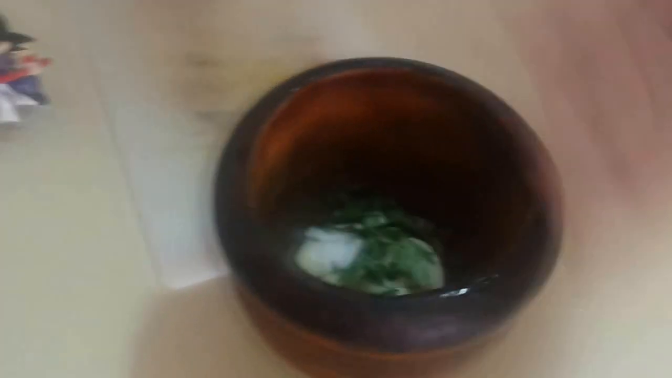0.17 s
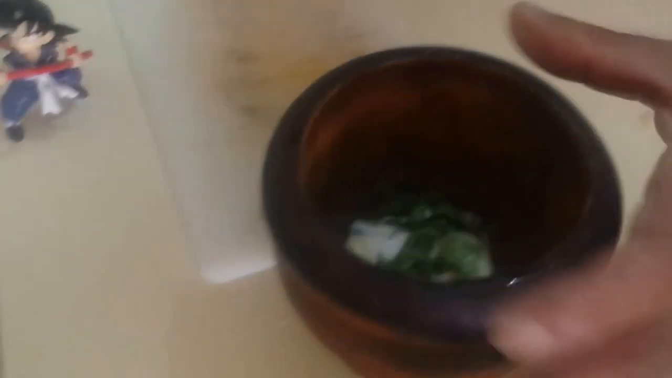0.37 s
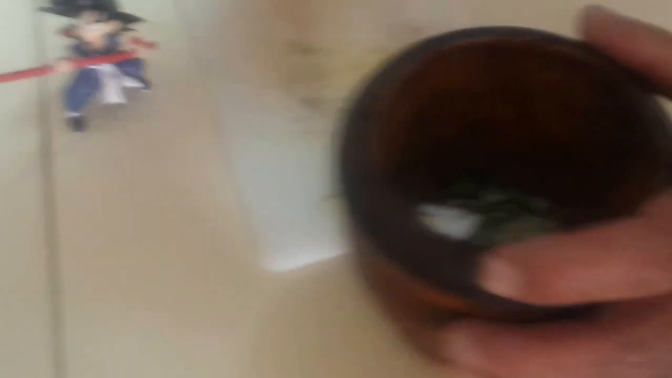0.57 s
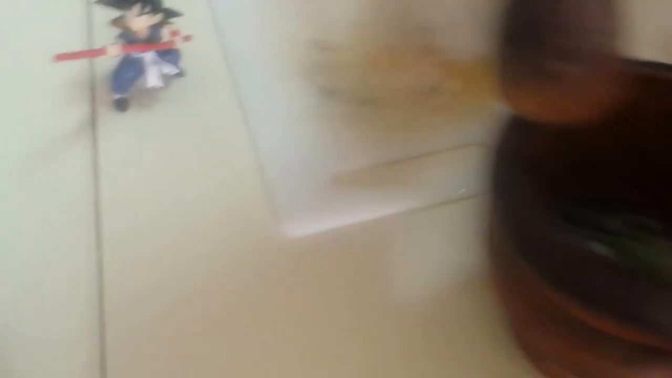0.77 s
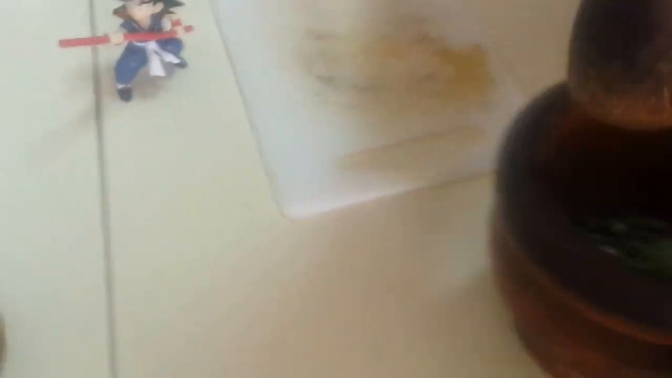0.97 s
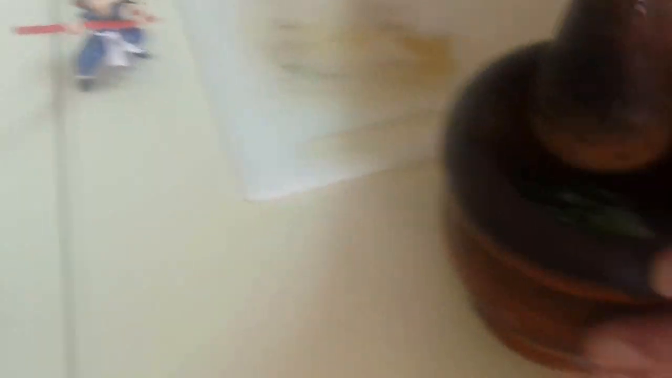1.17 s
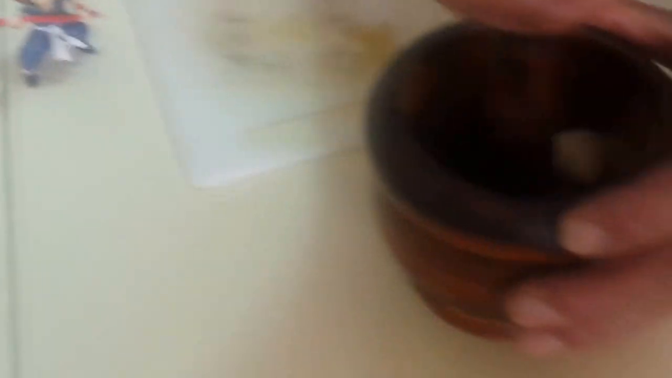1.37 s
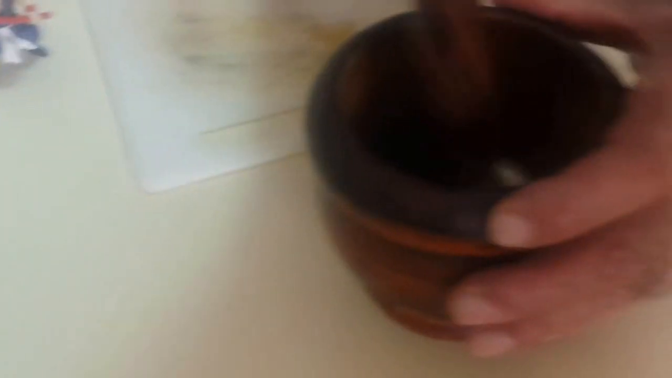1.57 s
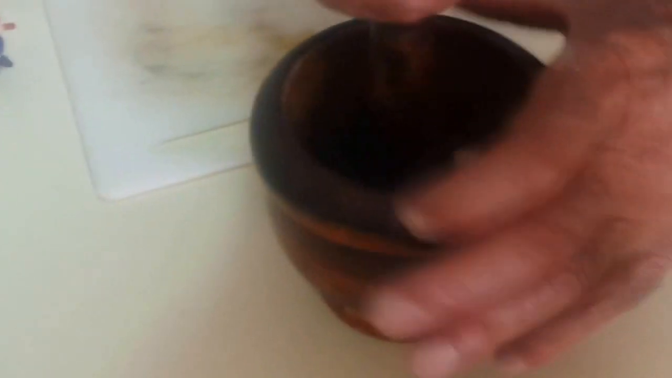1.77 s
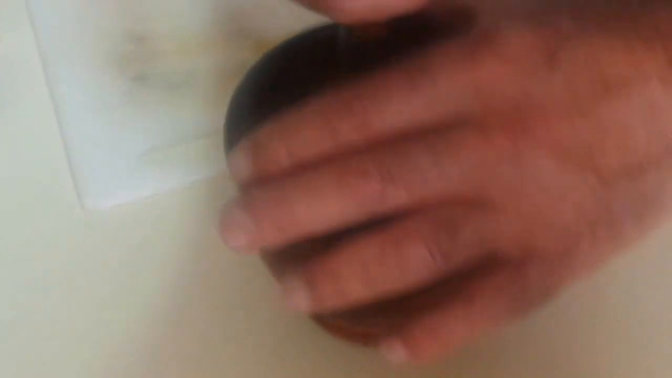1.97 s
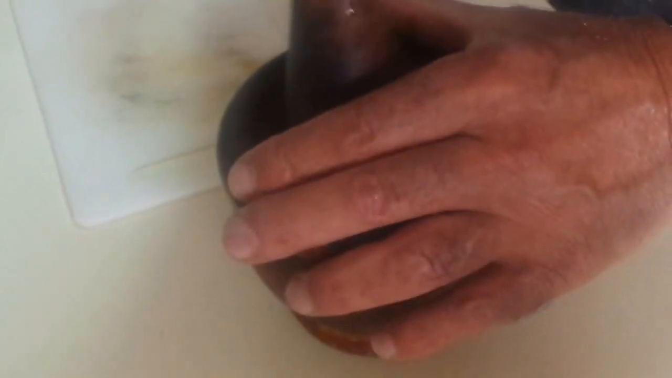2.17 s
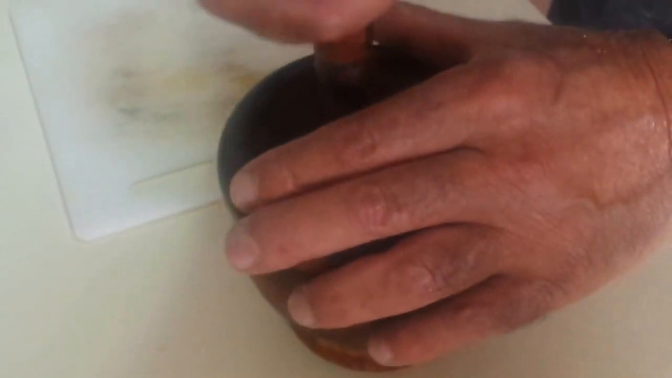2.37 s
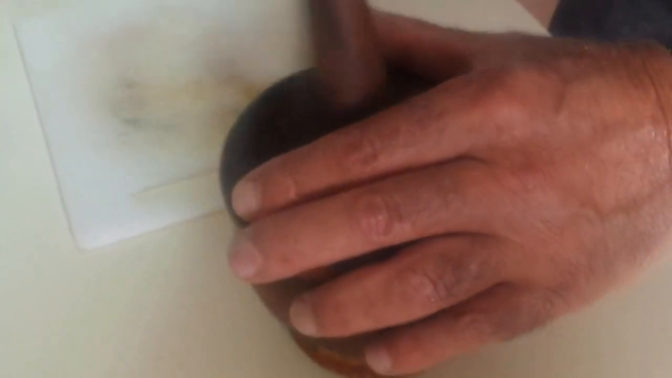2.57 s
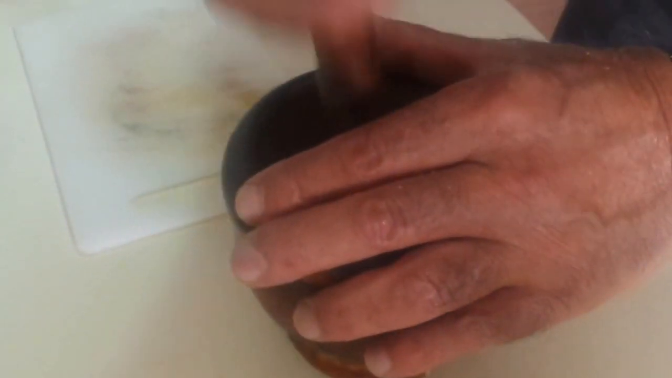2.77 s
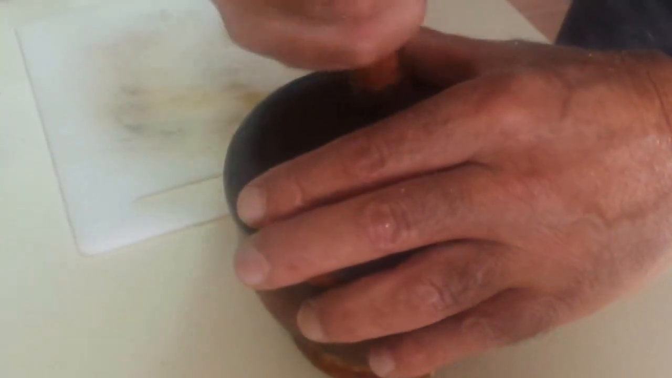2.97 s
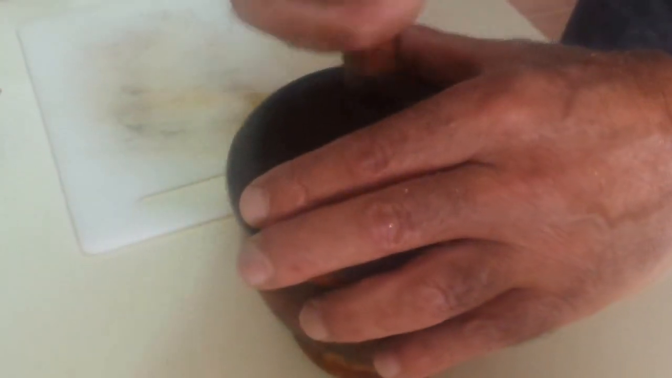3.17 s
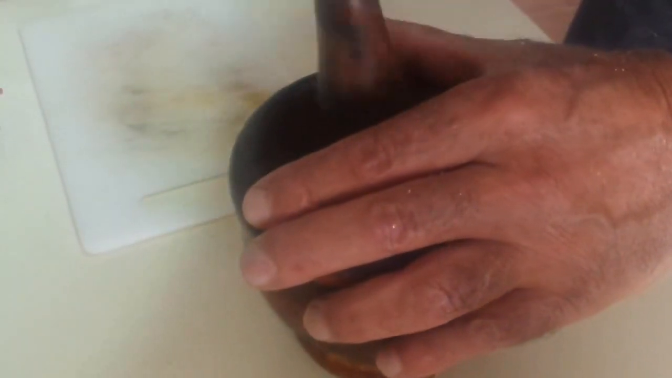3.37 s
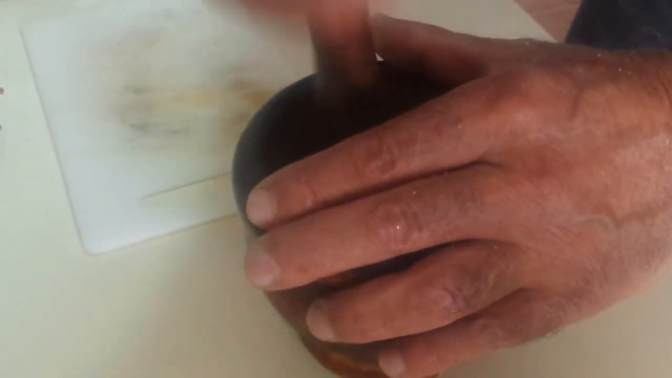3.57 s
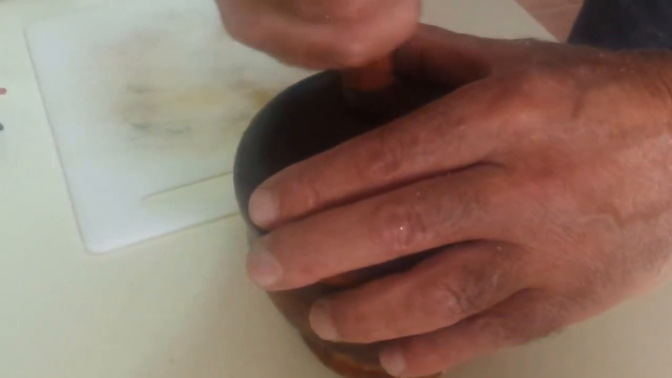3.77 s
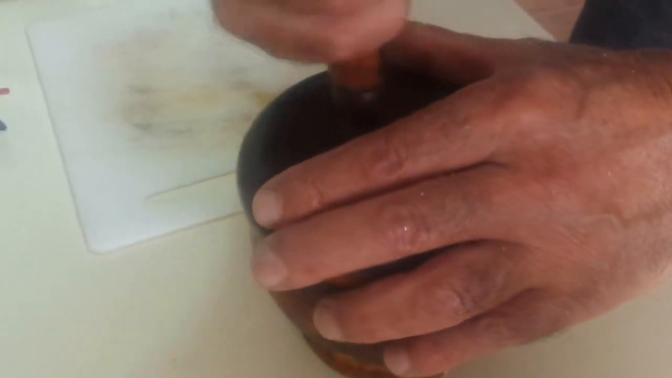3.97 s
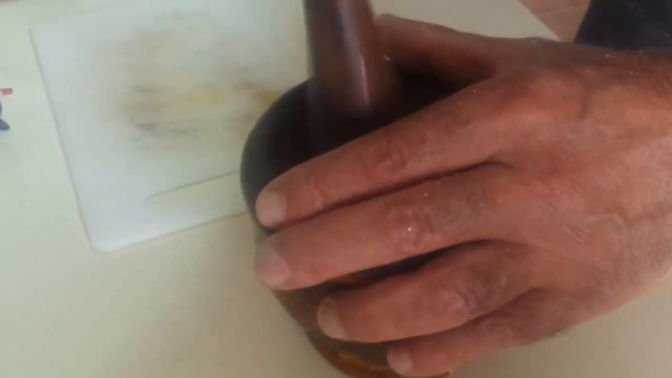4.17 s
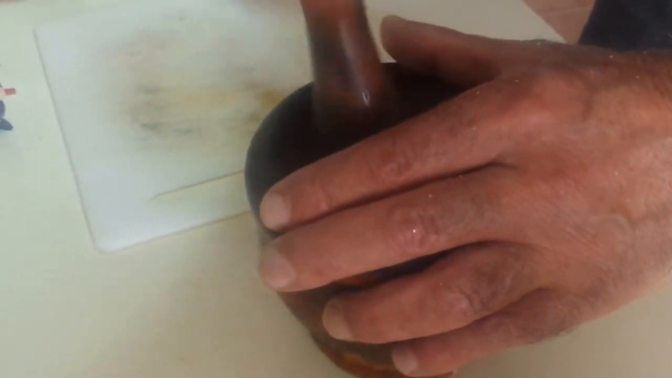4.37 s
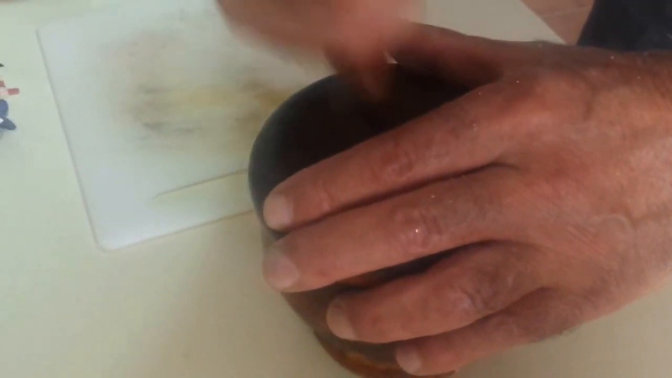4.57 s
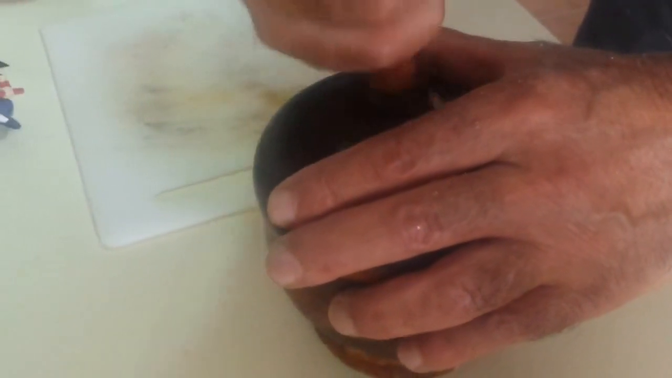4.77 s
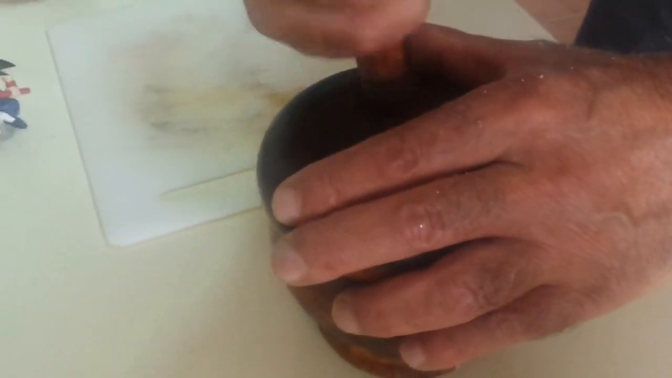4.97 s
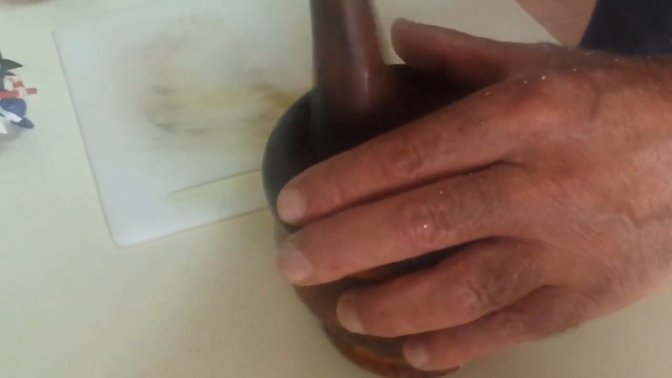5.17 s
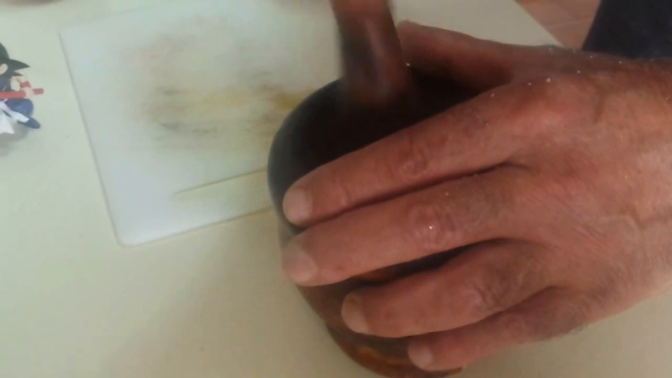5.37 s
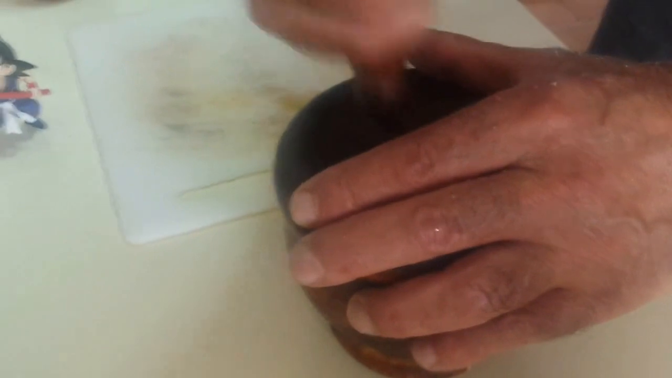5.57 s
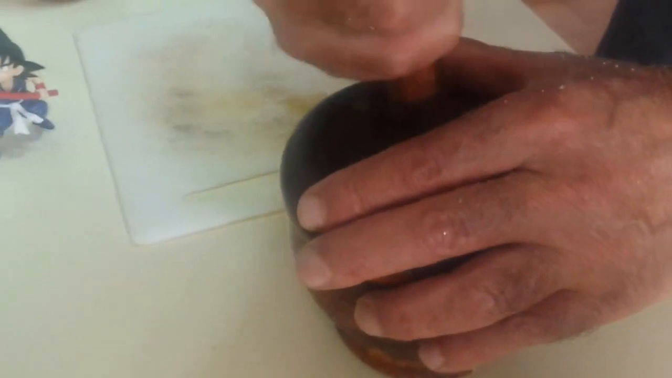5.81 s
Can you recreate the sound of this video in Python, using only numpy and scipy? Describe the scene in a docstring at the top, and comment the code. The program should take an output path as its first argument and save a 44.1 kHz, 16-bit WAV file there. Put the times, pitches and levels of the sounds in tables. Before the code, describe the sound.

At the very start a metal utensil hits the table on its end, then flat at 0.12 s, with two hard knocks and a thin high ring that rocks once at 0.2 s and stops by 1 s. Around 0.6 s a hand slides softly on the wooden bowl, and at 0.7 s the rim gives a hollow knock. Garlic pounding begins gently at 1.25 s, a heavy blow falls at 1.7 s, and the rim knocks again at 2.0 s. From 2.25 to 4.7 s strokes come regularly, about every quarter second, the strongest from 3.9 s. Each is a dry tick and landing, often with a small bounce, damp crunch, low table boom, rattle and occasional faint crockery chink. Light prods follow at 4.9 and 5.2 s, a loud bare-wood knock at 5.45 s and a bouncing stroke at 5.7 s. Close microphone, short bright room reflections, faint wavering hum and hiss.

```python
"""First a metal utensil clinks down on a kitchen table; then a wooden pestle pounds garlic in a wooden mortar.
Each stroke ticks and lands, most bounce: wood rings briefly, crushed leaves and garlic add noise.
The table booms as dying sines; loose things on it rattle as bursts of small knocks, and crockery chinks.
Close to two microphone ports, the sounds also feed a hard-walled room of sparse reflections.
A faint wavering hum and a hiss lie underneath."""
import sys
import numpy as np
from scipy import signal
from scipy.fft import rfft, irfft
from scipy.io import wavfile
from scipy.ndimage import uniform_filter1d

SR = 44100
rng = np.random.default_rng(int(sys.argv[2]) if len(sys.argv) > 2 else 0)


def decibels_to_gain(level_db):
    """Convert a level in decibels to a linear amplitude gain (20 dB per decade)."""
    exponent = np.asarray(level_db, float) / 20
    return 10 ** exponent


def to_wav(sig):
    """Store sig (one row per channel, or 1-D mono) as 16-bit WAV at the path in sys.argv[1].

    Samples outside -1..1 are clipped; the rate is SR.
    """
    pcm = np.clip(np.atleast_2d(sig), -1, 1) * 32767
    pcm = np.round(pcm).astype(np.int16)
    wavfile.write(sys.argv[1], SR, pcm.T)  # frames by channels


N = 257544  # length [samples]

# strokes into the garlic: (time of tick [s], tick [dB], landing [dB], rattle to the walls [dB], table boom [dB])
POUNDS = [(1.249, -22, -18.5, -33.5, -31), (1.679, -15.5, -1.5, -16.5, -14.5),
          (2.25, -13, -19, -27.5, -11.5), (2.581, -11, -12, -12.5, -18.5),
          (2.861, -14.5, -10.5, -25.5, -20), (3.13, -15.5, -21.5, -27, -19),
          (3.4, -18.5, -16.5, -19.5, -16.5), (3.672, -12, -23, -16, -10.5), (3.928, -14.5, -1.5, -12, -14),
          (4.184, -15.5, -0.5, -14, -9), (4.425, -15.5, -12, -16, -14), (4.68, -15.5, -3, -15.5, -9),
          (5.683, -12.5, -13, -18.5, -16)]
# the pestle bounces once after most strokes: (time [s], level [dB])
BOUNCES = [(1.324, -19.5), (2.295, -8.5), (2.629, -18), (3.175, -14.5), (3.445, -21), (3.718, -9.5),
           (3.969, -7.5), (4.228, -33), (4.468, -21), (4.733, -17), (5.739, -11.5)]
# single hard contacts on bare wood:
# (time [s], level [dB], rattle to the walls [dB], rattle treble to the walls [dB], table boom [dB])
TAPS = [(0.014, -10, -17, -38, -21), (0.124, -5.5, -19, -43.5, -23), (5.437, 0, -15.5, -35, -14.5)]
# light strokes that stop in the paste without landing: columns as TAPS
PRODS = [(4.927, -24, -35.5, -39, -32), (5.179, -14, -34.5, -36, -30)]
# the pestle catches the rim and the empty upper bowl rings out: columns as TAPS
RIM_KNOCKS = [(0.7, -5, -21, -44.5, -43), (2.026, -3, -26.5, -40.5, -37)]

# sound of each part of a stroke at USUAL_DB: (upper ring [dB], crack [dB], table push [dB], thump [dB])
TICK_SOUND = (-12.5, -15, -4.5, -1.5)
LANDING_SOUND = (-22, -32.5, -10.5, -100)
BOUNCE_SOUND = (-15, -24.5, -16, -9)
# sound of the single contacts: (upper ring over level [dB], crack over rattle treble [dB],
# push over boom [dB], thump over boom [dB], share sent to the walls [dB])
TAP_SOUND = (-11, 13, 9.5, -16, -32)
PROD_SOUND = (0.5, 18.5, 22, 18, -35)
RIM_SOUND = (-0.5, 12.5, 13, -14, -32.5)
# crispness from cloves to paste: (time [s], treble gain [dB])
CRISPNESS = [(1.2, 0), (2.6, 2), (3.3, 1), (4, 1), (5.7, -3)]

# low and upper ring of the mortar before detuning: (frequency [Hz], relative level [dB], t60 [s])
MORTAR_LOW = [(438, -8.5, 0.011), (719, -2, 0.0071), (809, -0.5, 0.009), (1112, -13.5, 0.012),
              (1290, -7, 0.0049)]
MORTAR_UPPER = [(1830, -14, 0.005), (2325, 5.5, 0.0047), (2857, -3.5, 0.01), (3426, -1.5, 0.005),
                (3990, 6, 0.0025)]
# table top before detuning; close pairs beat: (frequency [Hz], relative level [dB], t60 [s])
TABLE_MODES = [(85, -19, 0.17), (111.7, -17, 0.64), (125.2, -9.5, 0.57), (155.5, 6.5, 0.34),
               (156.55, 0.5, 0.46), (185, -16, 1), (236, -49, 0.074)]
# cupboard-like hollow: (frequency [Hz], relative level [dB], t60 [s])
HOLLOW_MODES = [(271, -9.5, 1), (320.8, -1, 0.94), (342, -17, 0.6)]
# spectrum of the loose things on the table: (frequency [Hz], relative density [dB])
RATTLE_SPECTRUM = [(150, -23.5), (250, -4), (321, -1.5), (574, -6.5), (673, -3), (1400, -3.5), (1530, -5.5),
                   (2670, -12), (3800, -28), (4940, -64), (8360, -120)]
# spectrum of cracks, fibres and skin: (frequency [Hz], relative density [dB])
TREBLE_SPECTRUM = [(2060, -12.5), (3500, -2.5), (6120, -2), (6650, -4), (13600, -21), (15200, -23.5),
                   (16000, -79)]

# crockery chinks around the time of most bounces: (time [s], level before the near and wall gains [dB])
CHINKS = [(2.62, -31), (3.44, -54), (3.712, -38), (3.968, -31.5), (4.224, -48), (4.482, -34.5), (4.72, -45),
          (5.72, -36)]
# crockery ring: (frequency [Hz], relative level [dB], t60 [s])
CROCKERY_MODES = [(3818, -6, .15), (4062, -12, .12), (4800, -15, .1), (6175, 0, .16)]
# the utensil lands on its end, then flat, then rocks once: (time [s] of each landing)
UTENSIL_LANDINGS = .0145, .1235, .212
# its ring: (frequency [Hz], first landing [dB], second [dB], third [dB], t60 [s])
UTENSIL_MODES = [(2336, -52, -44, -28, .45), (3283, -24, -28, -40, .6), (3296, -40, -42, -45, .5),
                 (8210, -33, -64, -75, .45), (9170, -56, -56, -75, .3), (11000, -45, -64, -80, .2),
                 (14300, -51, -68, -80, .1)]
# a hand slides on the bowl: (time [s], length [s], hiss [dB], bowl ring [dB])
SLIDES = [(0.566, 0.04, -56, -47), (0.634, 0.088, -53, -43.5)]

# reverberation of the room: (frequency [Hz], t60 [s])
ROOM_DECAY = [(100, 0.63), (260, 0.67), (700, 0.64), (1840, 0.57), (4850, 0.54), (12800, 0.48)]
# stereo width: (frequency [Hz], gain of the side signal [dB])
SIDE_GAIN = [(60, -24), (180, -14.5), (550, -7.5), (1650, 2), (4970, -0.5), (15000, 1)]
# tilt between the microphone ports: (frequency [Hz], left over right [dB])
PORT_TILT = [(60, -7), (150, 0.5), (380, 0), (950, 0), (2380, 5.5), (5980, 4), (15000, -11.5)]
# room hiss: (frequency [Hz], relative density [dB])
HISS_SPECTRUM = [(18, -40), (30, -15), (53, -14), (319, 1.5), (569, 2), (2410, -4), (3580, -11),
                 (6050, -10.5), (7670, -13.5), (10200, -21.5), (16000, -30)]
# hum: (frequency [Hz], level before it wavers [dB rms])
HUM_TONES = [(100, -73), (323, -56.5)]

LEAD = 0.006  # crushed leaves before the wood meets [s]
LANDING_S, SHAKE_S = 0.016, 0.011  # delay of landing and rattle after the tick [s]
USUAL_DB = -11.5  # contact level at which the stroke sounds hold [dB]
DETUNE, RIM_DETUNE = 0.07, 0.02  # greatest random shift of each mode [share of its frequency]


def crisp(s):
    """Treble gain [dB] of the garlic at s seconds."""
    return np.interp(s, *np.transpose(CRISPNESS))


def soft_contact(s, db, kind):
    """A contact through garlic: harder blows are louder in ring and crack alike and push the table more."""
    ring_follows, push_follows = 0.99, 0.66  # [dB per dB of the contact]
    follow = (db - USUAL_DB) * np.repeat([ring_follows, push_follows], 2)
    levels = np.add(kind, (0, crisp(s), 0, 0)) + follow
    leaves_db = db - 5
    return (s, -34, DETUNE, db, leaves_db, *levels)


def hard_contacts(table, sound, detune):
    """Single contacts, with levels tied to their own rattle treble and table boom."""
    *kind, wall_db = sound
    rows = []
    for s, db, _, treble_db, boom_db in table:
        levels = np.add(kind, (db, treble_db, boom_db, boom_db))
        rows.append((s, wall_db, detune, db, db - 15.5, *levels))  # less leaf crush
    return rows


def contacts():
    """Every sharp contact as (time [s], share sent to the walls [dB], detuning, levels for knock)."""
    rows = [soft_contact(s, tick_db, TICK_SOUND) for s, tick_db, *_ in POUNDS]
    rows += [soft_contact(s + LANDING_S, landing_db, LANDING_SOUND) for s, _, landing_db, *_ in POUNDS]
    rows += [soft_contact(s, db, BOUNCE_SOUND) for s, db in BOUNCES]
    rows += hard_contacts(TAPS, TAP_SOUND, DETUNE)
    rows += hard_contacts(PRODS, PROD_SOUND, DETUNE)
    rows += hard_contacts(RIM_KNOCKS, RIM_SOUND, RIM_DETUNE)
    return sorted(rows)


def knock(detune, level_db, leaves_db, upper_db, crack_db, push_db, thump_db):
    """Leaves crush, wood rings briefly and clicks, the table is pushed down and springs back."""
    size = 4096
    t = np.maximum(np.arange(size) / SR - LEAD, 0)  # time since the wood met [s]
    wood = wood_blow(t, detune, level_db, upper_db, crack_db)
    crush = crushed_leaves(size, leaves_db, crack_db + 1.5)
    push, thump = table_push(t)
    return wood, crush, decibels_to_gain(push_db) * push, decibels_to_gain(thump_db) * thump


def wood_blow(t, detune, low_db, upper_db, crack_db):
    """Two groups of bowl modes, driven as the surfaces flatten, and a slightly later crack."""
    def late(x):
        return np.pad(x, (round(LEAD * SR), len(t)))[:len(t)]

    force = (1 - np.exp(-t / 0.0009)) ** 2
    low = peak(force * late(ring(MORTAR_LOW, detune, size=2048)))
    upper = peak(force * late(ring(MORTAR_UPPER, detune, size=2048)))
    crack = peak(np.roll(late(colour(TREBLE_SPECTRUM)), 40))
    return decibels_to_gain(low_db) * low + decibels_to_gain(upper_db) * upper + decibels_to_gain(crack_db) * crack


def crushed_leaves(size, leaves_db, fibres_db):
    """Noise swells before the wood meets and dies after: bright fibres and softer leaves."""
    away = np.arange(size) / SR - LEAD - 0.001
    swell = np.exp(np.where(away < 0, away / 0.002, -away / 0.0035))
    noise = rng.standard_normal((2, size)) * swell
    fibres = peak(signal.oaconvolve(noise[0], colour(TREBLE_SPECTRUM))[:size])
    leaves = peak(signal.oaconvolve(even(noise[1]), colour(RATTLE_SPECTRUM))[:size])
    return decibels_to_gain(fibres_db) * fibres + decibels_to_gain(leaves_db) * leaves


def table_push(t):
    """The table under the blow: a quick 240 Hz push and a slower 55 Hz thump."""
    push = t / 0.0029 * np.exp(1 - t / 0.0014) * np.sin(2 * np.pi * 240 * t)
    thump = t / 0.021 * np.exp(1 - t / 0.0033) * np.sin(2 * np.pi * 55 * t)
    return push, thump


def crunch(rattle_db):
    """Sparse uneven snaps of crushed garlic ring the bowl."""
    bowl = ring([*MORTAR_LOW, *MORTAR_UPPER], DETUNE, size=600)
    return decibels_to_gain(rattle_db + 20) * chatter(0.036, 600, 4.8, bowl, size=12000)


def shakes():
    """Every shaking as (time [s], rise [s], rattle [dB], treble [dB], boom [dB], body)."""
    loose = colour(RATTLE_SPECTRUM)
    tap_rise = 0.0041  # [s]
    earlier_db = -41.5  # rattle still dying at the start
    rows = [(0, 0.0018, earlier_db, earlier_db - 18, earlier_db - 5, loose)]
    for s, _, landing_db, rattle_db, boom_db in POUNDS:
        rise = 0.0178 * decibels_to_gain(0.32 * (USUAL_DB - landing_db))  # softer landings build slower
        treble_db = -30 + crisp(s) + (rattle_db + 14.5)
        rows.append((s + SHAKE_S, rise, rattle_db, treble_db, boom_db, loose))
    rows += [(s, tap_rise, *levels, loose) for s, _, *levels in [*TAPS, *PRODS]]
    bowl = rim_body()
    rows += [(s, tap_rise, *levels, bowl) for s, _, *levels in RIM_KNOCKS]
    return sorted(rows, key=lambda row: row[0])


def rim_body():
    """The bowl rattles itself when its rim is caught, with no deep bass."""
    low = unit(ring(MORTAR_LOW, size=600))
    upper = unit(ring(MORTAR_UPPER, size=600))
    highpass = signal.butter(2, 420, "highpass", fs=SR, output="sos")
    return signal.sosfilt(highpass, low + decibels_to_gain(-18.5) * upper)


def shake(rise, rattle_db, treble_db, boom_db, body):
    """Small knocks chatter through a body while the table top swings."""
    rattle = decibels_to_gain(rattle_db) * chatter(rise, 2500, 3.08, body)
    rattle += decibels_to_gain(treble_db) * chatter(rise, 4000, 7.3, colour(TREBLE_SPECTRUM))
    boom = signal.oaconvolve(np.hanning(90), ring(TABLE_MODES, detune=0.022, size=36000))
    return rattle, decibels_to_gain(boom_db) * peak(boom)


def chatter(rise, per_s, uneven_db, body, size=8192):
    """A burst of small knocks of uneven size through a body; energy 1."""
    t = np.arange(size) / SR
    swing = t / rise * np.exp(-t / rise)
    fade = np.minimum(8 * np.e * swing, 1)
    struck = rng.random(size) < per_s / SR
    strength = decibels_to_gain(uneven_db * np.minimum(rng.exponential(1, size), 4))
    hits = rng.standard_normal(size) * struck * strength
    return unit(signal.oaconvolve(fade * even(swing * hits), body)[:size])


def chink(db):
    """Crockery rings in a burst of small contacts."""
    return decibels_to_gain(db) * chatter(0.009, 370, 4.0, ring(CROCKERY_MODES, size=6000))


def utensil():
    """Metal rings from each landing until the next stops it and strikes it anew; the last is stopped at 1 s."""
    out = np.zeros(N)
    ends = [*UTENSIL_LANDINGS[1:], 1]
    for k, (s, end) in enumerate(zip(UTENSIL_LANDINGS, ends)):
        modes = [(row[0], row[k + 1], row[-1]) for row in UTENSIL_MODES]
        held = ring(modes, size=round((end - s) * SR))
        stop = np.minimum(np.arange(len(held))[::-1] / 100, 1)
        add(out, s, held * stop)
    return out


def slide(length, hiss_db, ring_db):
    """Skin rubs on wood: a soft hiss with a little bowl ring."""
    size = round(length * SR)
    rub = rng.standard_normal(size) * np.hanning(size)
    bowl = unit(ring(MORTAR_LOW, size=2048))
    return signal.oaconvolve(rub, decibels_to_gain(hiss_db) * colour(TREBLE_SPECTRUM) + decibels_to_gain(ring_db) * bowl)


def hollow(drive):
    """Cupboard-like ring set off by the knocks and rattles."""
    return signal.oaconvolve(drive, ring(HOLLOW_MODES, size=44000))[:N]


def room_tail(size=36000):
    """Sparse reflections of random sign, starting after the first wall, each band dying at its own speed."""
    first, gap = 260, 16  # [samples]
    taps = np.zeros((2, size))
    at = np.arange(first, size - gap, gap) + rng.integers(0, gap, (2, (size - first - 1) // gap))
    np.put_along_axis(taps, at, rng.choice([-1., 1.], at.shape), 1)
    hz, t, z = signal.stft(taps, SR, nperseg=256)
    decay = decibels_to_gain(-60 * t / read(ROOM_DECAY, hz)[:, None])
    tail = signal.istft(z * decay, SR, nperseg=256)[1][:, :size]
    return tail / np.max(abs(tail[0, first:])) * 4  # offsets the gaps between reflections


def background():
    """Room hiss and a wavering hum, as mid and side."""
    t = np.arange(N) / SR
    noise = rng.standard_normal((2, N))
    mid, side = signal.oaconvolve(noise, colour(HISS_SPECTRUM)[None], axes=1)[:, :N] * decibels_to_gain(-54.5)
    wander = uniform_filter1d(rng.standard_normal((len(HUM_TONES), N)), 4000, axis=1) * 25
    for (hz, db), w in zip(HUM_TONES, wander):
        waver = 1 + 0.35 * np.tanh(w)
        mid = mid + decibels_to_gain(db) * np.sqrt(2) * waver * np.sin(2 * np.pi * hz * t)
    return np.array([mid, side])


def ring(modes, detune=0., size=8192):
    """Dying sines of a struck thing, neighbours in opposite phase, each mode shifted at random by detune."""
    t = np.arange(size) / SR
    out = np.zeros(size)
    for k, (hz, db, t60) in enumerate(modes):
        shifted = hz * (1 + detune * rng.uniform(-1, 1))
        out += (-1) ** k * decibels_to_gain(db - 60 * t / t60) * np.sin(2 * np.pi * shifted * t)
    return out


def colour(points, size=4096):
    """Causal minimum-phase filter of energy 1 with the given spectrum."""
    log_gain = np.log(decibels_to_gain(read(points, abs(np.fft.fftfreq(size, 1 / SR)))))
    phase = -signal.hilbert(log_gain).imag
    return unit(np.fft.ifft(np.exp(log_gain + 1j * phase)).real[:size // 2])


def even(x):
    """Keeps the rough timing of a burst but gives it a flat spectrum; energy 1."""
    z = rfft(x)
    return unit(irfft(z / (abs(z) + 1e-9), len(x)))


def read(points, hz):
    """Value of a spectrum table at the frequencies hz, on a log frequency scale."""
    f, value = np.transpose(points)
    return np.interp(np.log(hz + 1), np.log(f + 1), value)


def unit(x):
    """Scales to energy 1."""
    return x / np.sqrt(np.sum(x ** 2) + 1e-20)


def peak(x):
    """Scales to peak 1."""
    return x / abs(x).max()


def add(mix, s, sound):
    """Mixes a sound in at s seconds."""
    part = mix[..., round(s * SR):][..., :sound.shape[-1]]
    part += sound[..., :part.shape[-1]]


def lag(x, size):
    """A copy delayed by size samples, minus the sound itself."""
    return np.pad(x, (size, 0))[:N] - x


def ports(mid, side, size=1024):
    """Mid and side to the left and right microphone ports, with width and tilt set by frequency."""
    hz, _, z = signal.stft([mid, side], SR, nperseg=size)
    z[1] *= decibels_to_gain(read(SIDE_GAIN, hz))[:, None]
    tilt = decibels_to_gain(read(PORT_TILT, hz) / 2)[:, None]
    pair = [(z[0] + z[1]) * tilt, (z[0] - z[1]) / tilt]
    return signal.istft(pair, SR, nperseg=size)[1][:, :len(mid)]


def scene():
    """Near sound plus three room tails of the same decay, taken in turn by successive sounds."""
    near, bass, pushes, sends = utensil(), np.zeros(N), np.zeros(N), np.zeros((3, N))
    sends[0] += decibels_to_gain(-44) * near
    for k, (s, wall_db, *levels) in enumerate(contacts()):
        wood, crush, push, thump = knock(*levels)
        add(near, s - LEAD, wood + crush)
        add(bass, s - LEAD, thump)
        add(pushes, s - LEAD, push)
        add(sends[k % 3], s - LEAD, decibels_to_gain(wall_db) * (wood + 1.17 * crush) + decibels_to_gain(-31.0) * push)
    for k, (s, rise, *levels) in enumerate(shakes()):
        rattle, boom = shake(rise, *levels)
        add(sends[k % 3], s, rattle)
        add(near, s, decibels_to_gain(29.0) * rattle)
        add(bass, s + 0.745 * rise, boom)  # the swing builds with the rattle
    for k, (s, db) in enumerate(CHINKS):
        crockery = chink(db)
        add(sends[k % 3], s, decibels_to_gain(-5.0) * crockery)
        add(near, s, decibels_to_gain(33.5) * crockery)
    for s, _, _, rattle_db, _ in POUNDS:
        add(near, s + LANDING_S, crunch(rattle_db))
    for s, *settings in SLIDES:
        add(near, s, slide(*settings))
    bass += pushes + hollow(decibels_to_gain(-25) * sends.sum(axis=0) + decibels_to_gain(-58.0) * pushes)
    room = sum(signal.oaconvolve(send[None], room_tail(), axes=1)[:, :N] for send in sends)
    mid, side = room + background()
    # near sound reaches the right port first, which leaves a sloped copy in the side signal
    side = side + 0.55 * lag(near, size=5) + 0.46 * lag(bass, size=40)
    return ports(mid + near + bass, side)


def microphone(dry):
    """Drops the deepest bass and the highest treble."""
    thin = signal.sosfilt(signal.butter(2, 62, "highpass", fs=SR, output="sos"), dry)
    return signal.sosfilt(signal.butter(8, 15300, fs=SR, output="sos"), thin)


def limiter(x):
    """Turns both ports down together after a loud peak, gripping a moment late and letting go slowly."""
    limit_db, squeeze, recovery, grip = -3.5, 0.95, 109, 0.0008  # [dB], [dB per dB], [dB/s], [s]
    peak_db = 20 * np.log10(abs(x).max(0) + 1e-9)
    fall = np.arange(N) * recovery / SR
    over_db = np.maximum(np.maximum.accumulate(peak_db + fall) - fall - limit_db, 0)
    keep = np.exp(-1 / (grip * SR))
    return x / decibels_to_gain(squeeze * signal.lfilter([1 - keep], [1, -keep], over_db))


def top_cut(x):
    """Nothing passes above the cut-off."""
    return signal.sosfilt(signal.butter(12, 16500, fs=SR, output="sos"), x)


def record(dry):
    """The microphone thins the sound, the limiter holds its peaks and the last excess is clipped."""
    mix = np.clip(limiter(microphone(dry)), -0.98, 0.98)
    return top_cut(mix)


dry = scene()
out = record(dry)
to_wav(out)
```